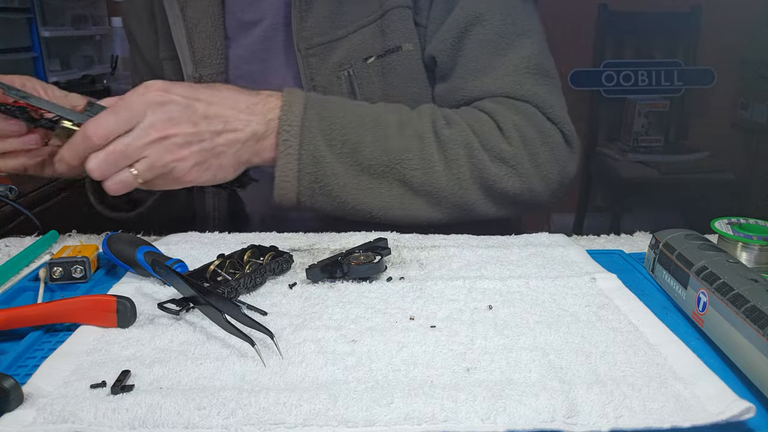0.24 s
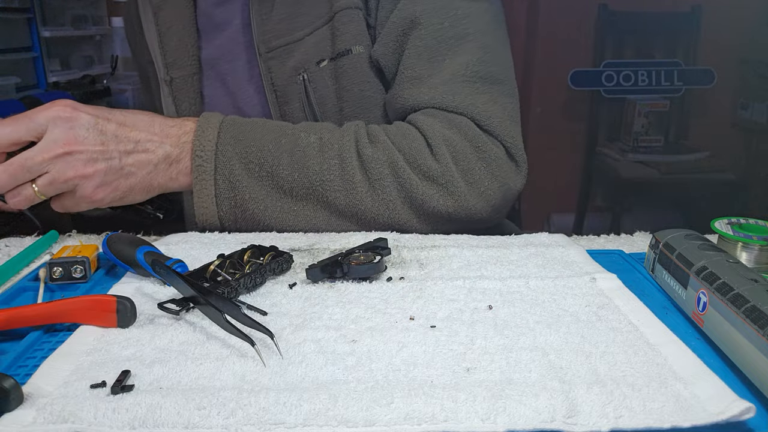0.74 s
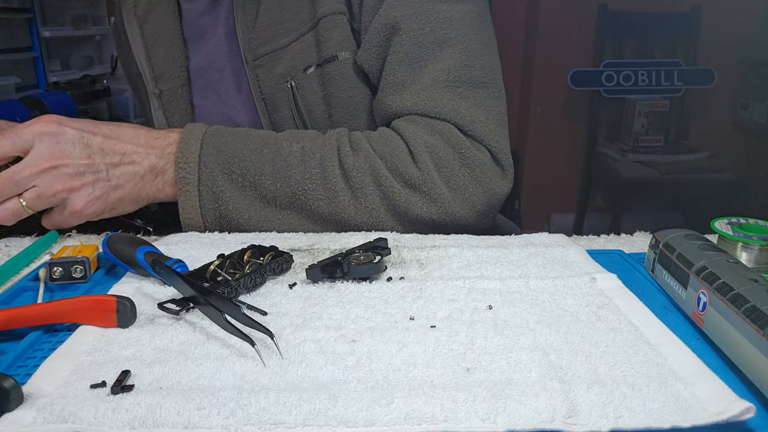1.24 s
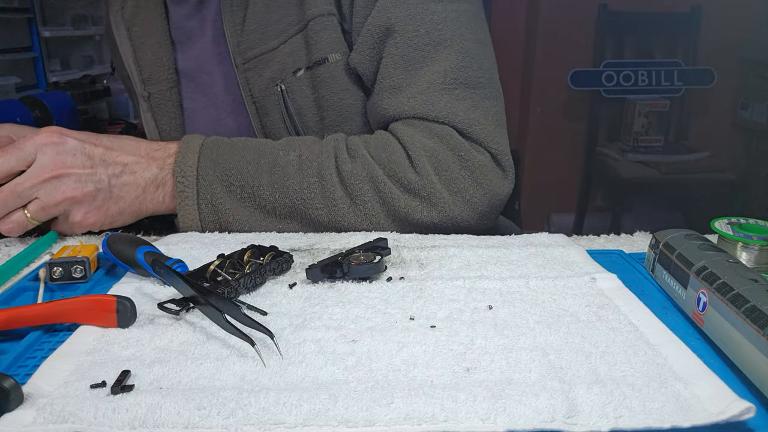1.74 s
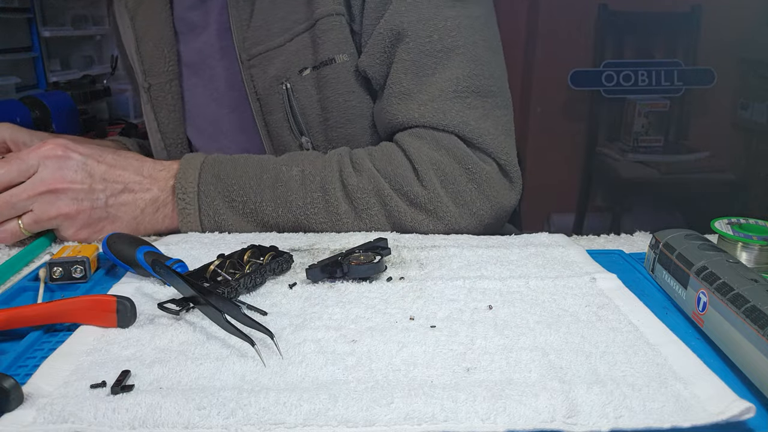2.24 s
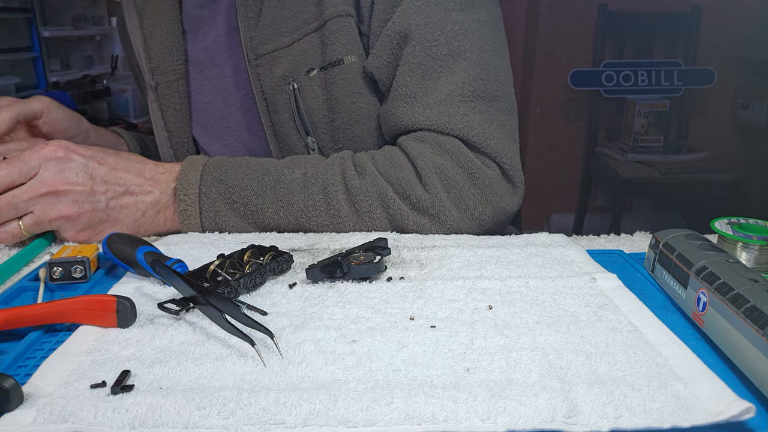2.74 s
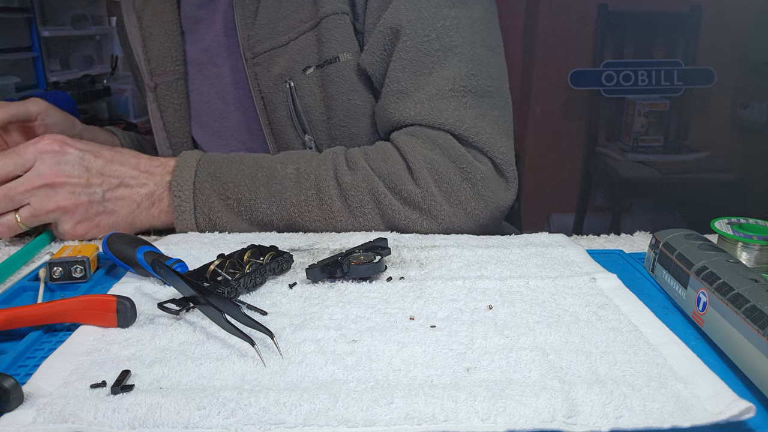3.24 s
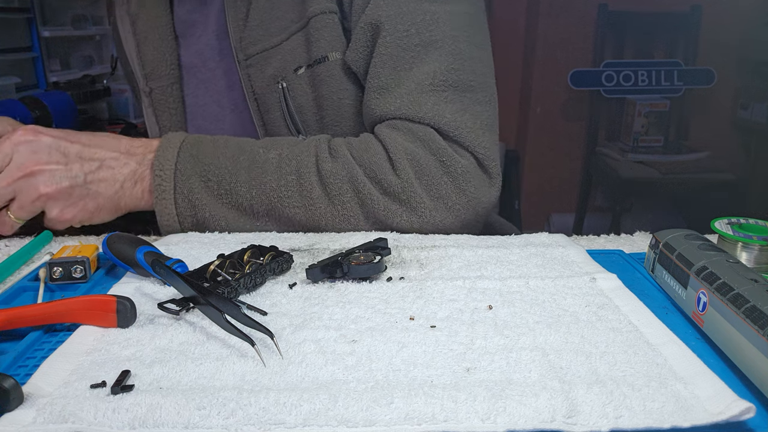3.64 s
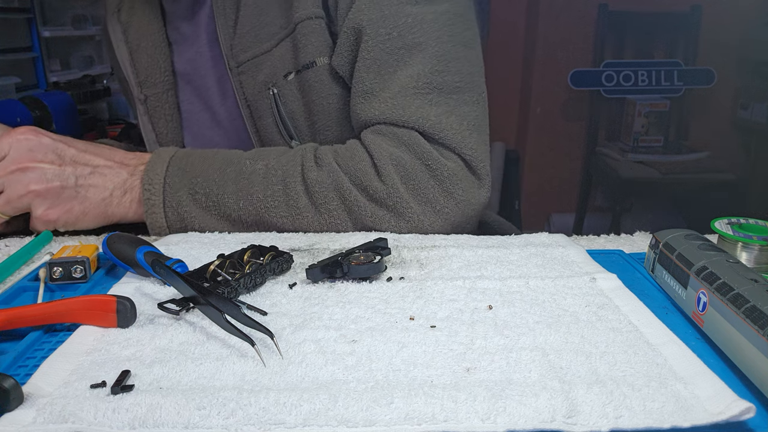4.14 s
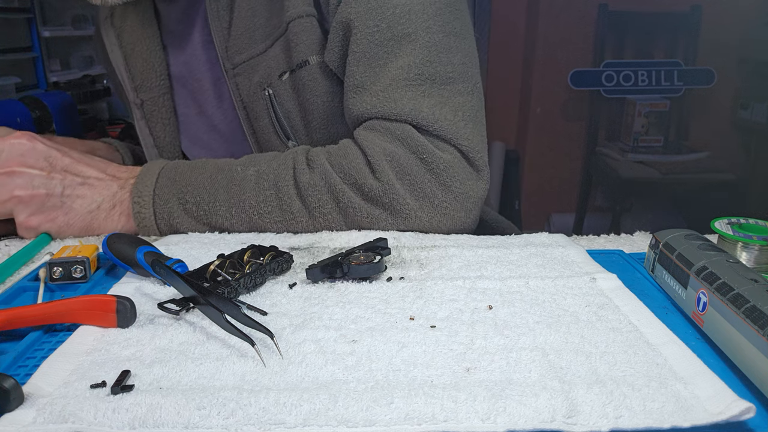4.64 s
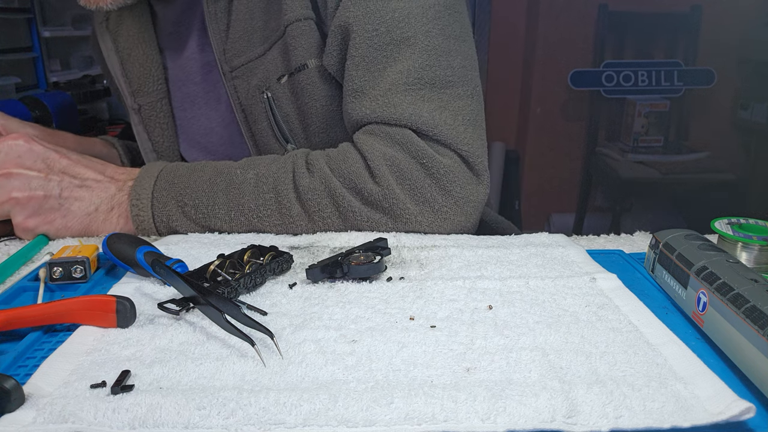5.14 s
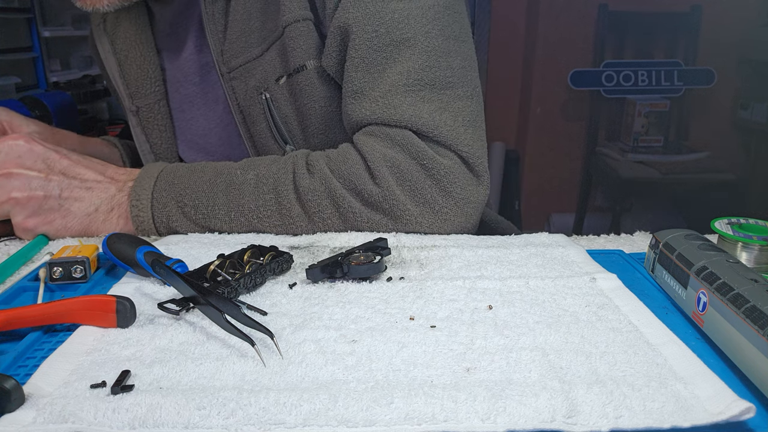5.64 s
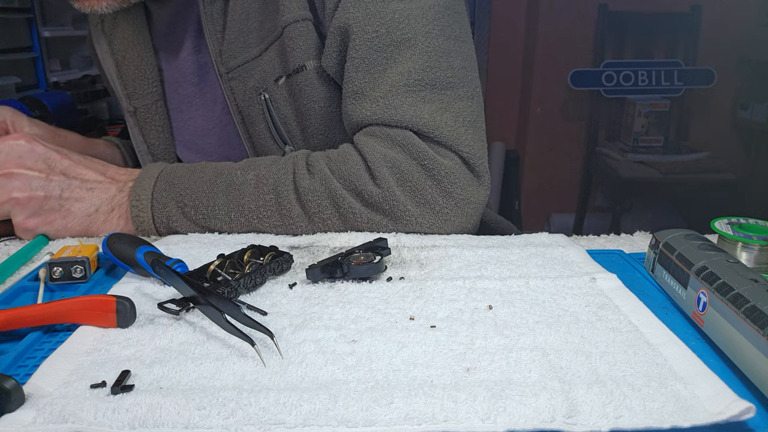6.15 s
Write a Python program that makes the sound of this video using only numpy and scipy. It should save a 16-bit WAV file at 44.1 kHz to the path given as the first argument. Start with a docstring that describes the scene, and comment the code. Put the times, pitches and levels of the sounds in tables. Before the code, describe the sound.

In a small room with faint background noise, a part knocks and scrapes in the jaws of a nearby metal vise being tightened. The taps start lightly and build to a cluster of hard clacks and bright clinks as the steel handle drops. After a brief lull comes another run of clicks and a firm last knock. Soft rubbing and brief steel squeaks fill the gaps.

```python
"""Winding a bench vise shut

A small metal vise closes on a motor part at a workbench in a small room. Part and jaws knock, each blow
a burst of tiny contacts that rings the vise and thuds in the bench top. The loose steel handle bar
drops and clinks in the spindle. Between blows the screw hisses, steel squeaks, and hands and a sleeve
rub over a faint room tone."""
import sys
import numpy as np
from scipy import signal
from scipy.fft import rfft, irfft, next_fast_len
from scipy.io import wavfile
from scipy.ndimage import uniform_filter1d

SR = 44100
rng = np.random.default_rng(int(sys.argv[2]) if len(sys.argv) > 2 else 0)


def waveform_to_disk(signal):
    """Save audio, clipped to [-1, 1], as 16-bit WAV at the path in sys.argv[1]."""
    frames = np.transpose(np.atleast_2d(signal))
    scaled = np.clip(frames, -1, 1) * 32767
    samples = np.round(scaled).astype(np.int16)
    wavfile.write(sys.argv[1], SR, samples)


N = 282636
HIT = 8192  # samples that one blow lasts

# modes of the bench top: pitch_hz, width_hz, level_db
BENCH_MODES = [(49.35, 15, -10), (82, 9.1, -14.5), (133.3, 7.7, 6.5), (158.6, 24, -3.5), (226, 25, -2),
               (258.8, 21, -1.5), (332, 55, 3), (369, 28, -1), (407.7, 30, -8), (533, 52, -9.5)]
# modes of the vise and the part in it: pitch_hz, width_hz, level_db
VISE_MODES = [(580, 30, -17.5), (702, 36, 3.5), (810, 60, -2.5), (887.7, 49, 11), (993, 50, 2),
              (1149, 24, -11), (1318, 180, 5), (1510, 310, 0), (1651, 76, 1.5), (1760, 220, -17),
              (1992, 96, -8), (2050, 37, -26)]
# spectrum of a knock's hard edge: freq_hz, level_db
EDGE_SPECTRUM = [(1500, -36.5), (2350, -7), (2750, 2.5), (3150, -6), (3580, 2), (3850, -3.5), (4150, -13.5),
                 (4500, -14), (5600, -31), (6550, -23), (7500, -27.5), (16000, -42)]
# spectrum of a bright steel-on-steel contact: freq_hz, level_db
TICK_SPECTRUM = [(2000, -23.5), (4400, 10.5), (5700, -5), (6600, -1), (7700, 2.5), (9300, -6.5),
                 (10000, -7.5), (11800, -17), (13200, -6.5), (16000, -5.5)]
# how hard the hands work: time_s, level_db
HAND_EFFORT = [(0.801, -79), (1.05, -69), (1.3, -55), (1.5, -60.5), (1.77, -53), (2.35, -66),
               (2.591, -55.5), (2.78, -38), (2.88, -47), (3.14, -50.5), (3.44, -40.5), (3.7, -51),
               (4.08, -57.5), (4.72, -74), (5.0, -65), (5.56, -60), (5.88, -64), (6.4, -44.5)]


def undb(db):
    """Decibels to gain."""
    return 10 ** (np.asarray(db) / 20)


def unit(x):
    """Scale to rms 1."""
    return x / np.sqrt(np.mean(x ** 2))


def add(track, start_s, x):
    """Mix x into the track from start_s."""
    start = max(int(start_s * SR), 0)
    part = x[:max(N - start, 0)]
    track[start:start + len(part)] += part


def fader(curve):
    """Gain at every sample from (time_s, level_db) points; shut outside them."""
    time_s, level_db = np.transpose(curve)
    return undb(np.interp(np.arange(N) / SR, time_s, level_db, left=-120, right=-120))


def along(points, size):
    """Read (freq_hz, value) points at every bin of a spectrum."""
    hz, value = np.transpose(points)
    return np.interp(np.log(np.fft.rfftfreq(size, 1 / SR) + 1), np.log(hz), value)


def colour(points, size=HIT):
    """Minimum-phase EQ curve through (freq_hz, level_db) points."""
    cepstrum = irfft(np.log(undb(along(points, size))), size)
    cepstrum[1:size // 2] *= 2
    cepstrum[size // 2 + 1:] = 0
    return np.exp(rfft(cepstrum))


def resonances(modes):
    """Frequency response of parallel (pitch_hz, width_hz, level_db) modes."""
    s = 1j * np.fft.rfftfreq(HIT, 1 / SR)
    return sum(undb(db) * width * s / (s * s + width * s + hz * hz) for hz, width, db in modes)


def strike(response, decay_ms, rise_ms=0.65, grain_db=3):
    """A burst of tiny uneven contacts rings a body; rms 1 over its first 12 ms."""
    ms = np.arange(HIT) / SR * 1000
    push, size = rng.standard_normal((2, HIT))
    envelope = np.exp(-ms / max(decay_ms, .5)) * (1 - np.exp(-ms / rise_ms))
    force = push * undb(grain_db * size) * envelope
    ring = irfft(rfft(force) * response)
    return ring / np.sqrt(np.mean(ring[:int(.012 * SR)] ** 2))


def slide(response, decay_ms):
    """A short slide: softer in attack and grainier than a strike."""
    return strike(response, decay_ms, rise_ms=1.1, grain_db=3.5)


def friction(response, slips_per_s, spread_db):
    """Dense little slips of uneven size ring a body."""
    slips = rng.random(N) < slips_per_s / SR
    sizes = undb(spread_db * np.minimum(rng.exponential(size=N), 4))
    force = slips * sizes * rng.choice([-1, 1], N)
    return unit(signal.oaconvolve(force, irfft(response))[:N])


def stereo_noise(size):
    """Left and right noise spectra, alike in the bass and wide in the treble."""
    # likeness of the two sides: freq_hz, correlation
    likeness = [(100, 0.84), (350, 0.9), (900, 0.022), (3000, 0.067), (8000, .05)]
    like = np.clip(along(likeness, size), 0, 1)
    mid, side = rfft(rng.standard_normal((2, size)))
    return (mid * np.sqrt(1 + like) + np.array([[1], [-1]]) * side * np.sqrt(1 - like)) / np.sqrt(2)


def even(response):
    """A cluttered room favours no pitch: level the broad humps and dips, keep the fine ripple."""
    spectrum, hz = rfft(response), np.fft.rfftfreq(len(response), 1 / SR)
    power = np.abs(spectrum) ** 2
    hump_db = 10 * np.log10(uniform_filter1d(power, size=21) / uniform_filter1d(power, size=301))
    return irfft(spectrum * colour(np.transpose([hz + 1, -hump_db]), len(response)))


def room(dry, wet_db, build_ms=0.33):
    """Direct sound plus dense reflections from bench and walls; the bass lingers."""
    # reverb time by band: centre_hz, t60_s
    decay_times = [(100, 0.39), (300, 0.35), (800, 0.27), (2000, 0.14), (5000, 0.2), (9000, 0.21),
                   (15000, 0.14)]
    centres, t60s = np.transpose(decay_times)
    size = 2 * HIT
    t, hz = np.arange(size) / SR, np.fft.rfftfreq(size, 1 / SR)
    noise, tail = stereo_noise(size), np.zeros((2, size))
    for share, t60 in zip(np.eye(len(centres)), t60s):
        band = np.interp(np.log(hz + 1), np.log(centres), share)
        tail += irfft(noise * band) * np.exp(-np.log(1000) * t / t60)
    tail *= 1 - np.exp(-1000 * t / build_ms)
    response = undb(wet_db) * unit(tail) / np.sqrt(size)
    response[:, 0] += 1  # direct sound
    return signal.oaconvolve(dry[None], np.array([even(side) for side in response]), axes=1)[:, :N]


def room_tone(size, level_db=-73):
    """A faint, steady bed of bass-heavy noise."""
    # spectrum of the quiet room: freq_hz, level_db
    spectrum = [(15, -35.5), (25, -18.5), (55, -4), (223, -1.5), (394, -8), (714, -19.5), (1040, -24.5),
                (1190, -13), (1610, -26.5), (1790, -17.5), (6380, -29), (9320, -21.5), (14800, -27.5),
                (16000, -26.5)]
    noise = irfft(stereo_noise(size) * undb(along(spectrum, size)), size)
    return undb(level_db) * unit(noise[:, :N])


def skin_brush(start_s=.132, level_db=-62):
    """Dry skin slides over the part with a short bright swish."""
    out, skin = np.zeros(N), colour([(2000, -14), (4500, 2), (7000, -10), (14000, 5)])
    add(out, start_s, undb(level_db) * strike(skin, decay_ms=30, rise_ms=16))
    return out


def sleeve_rustle(trim_db=-1):
    """A sleeve and fingers rustle as the part is carried to the vise."""
    # swell of the rustle: time_s, level_db
    carry = [(0.0, -60), (0.192, -62.5), (0.228, -78), (0.254, -66.5), (0.346, -67), (0.368, -70.5),
             (0.8, -89.5)]
    # spectrum of the cloth: freq_hz, level_db
    cloth = [(40, -17.5), (130, -11), (250, -7), (380, 2.5), (620, -12), (950, -12), (1220, -3),
             (1650, -10), (2900, -16.5), (5000, -19.5), (16000, -28.5)]
    return undb(trim_db) * fader(carry) * friction(colour(cloth), slips_per_s=2400, spread_db=3.8)


def screw_hiss():
    """The thread rubs in a fine hiss that swells and fades with each turn."""
    # turns of the screw: peak_s, level_db, half_length_s
    turns = [(1.39, -80, 0.055), (1.83, -65, 0.29), (2.24, -60.5, 0.13), (3.114, -56.5, .05),
             (3.672, -65.5, 0.091), (4.03, -75, .1), (5.562, -69, 0.049), (6.351, -68.5, 0.24)]
    # spectrum of the sliding thread: freq_hz, level_db
    thread = [(2000, -16.5), (3200, 1.5), (4200, 2.5), (5200, -2), (6500, -13), (8300, -2.5), (9500, -14.5),
              (10700, -6), (12000, -15.5), (16000, -13.5)]
    t = np.arange(N) / SR
    swell = sum(undb(db) * np.exp(-((t - peak_s) / half_s) ** 2) for peak_s, db, half_s in turns)
    return swell * friction(colour(thread), slips_per_s=6000, spread_db=2)


def rubbing(rumble_db=-4, scrape_db=-9):
    """Hands shift the vise on the bench; the part scrapes and shuffles in the jaws."""
    # short slides of the part: start_s, level_db, decay_ms
    shuffles = [(.047, -66, 2.6), (.317, -60, 11), (1.364, -45.5, 48), (1.425, -51, 17), (1.635, -51.5, 75),
                (1.843, -60, 8.4), (1.97, -55.5, 92), (2.962, -26, 23), (3.21, -31, 12), (3.762, -43.5, 35),
                (4.604, -54, 6.8), (4.7, -56.5, 6), (4.805, -39, 6.5)]
    bench_eq = colour([(70, 2), (100, -7.5), (130, -6.5), (400, -1), (600, -6.5), (3000, -26)])
    jaws_eq = colour([(3500, 5.5), (7000, -6)])
    bench = resonances(BENCH_MODES) * bench_eq
    jaws = (resonances(VISE_MODES) + undb(-26) * colour(EDGE_SPECTRUM)) * jaws_eq
    rumble = undb(rumble_db) * friction(bench, slips_per_s=600, spread_db=5.5)
    scrape = undb(scrape_db) * friction(jaws, slips_per_s=900, spread_db=3.8)
    out = fader(HAND_EFFORT) * (rumble + scrape)
    for start_s, db, decay_ms in shuffles:
        add(out, start_s, undb(db) * slide(jaws, decay_ms))
    return out


def squeaks(width_hz=48):
    """Steel drags on steel and one resonance of the bar or the screw sings briefly."""
    # singing slips: start_s, pitch_hz, level_db, decay_ms
    drags = [(0.899, 2850, -70, 7), (1.201, 2870, -59, 3.8), (1.33, 10530, -65, 45),
             (1.346, 2810, -51.5, 13), (1.431, 3940, -54.5, 9.9), (1.515, 2810, -64, 7),
             (1.621, 2830, -52.5, 2), (1.741, 2880, -57, 14), (1.867, 2824, -48, 5.3),
             (2.972, 10520, -36, 40), (3.505, 2800, -43, 1.7), (4.693, 2800, -66.5, 8),
             (6.136, 2904, -57, 35), (6.284, 2920, -55, 47)]
    out = np.zeros(N)
    for start_s, hz, db, decay_ms in drags:
        add(out, start_s, undb(db) * slide(resonances([(hz, width_hz, 0)]), decay_ms))
    return out


def ticks():
    """Metal touches metal with a bright, toneless tick."""
    # light contacts: start_s, level_db
    touches = [(0.045, -60.5), (.317, -60.5), (0.638, -69), (1.275, -55.5), (2.985, -36.5), (3.264, -25.5),
               (3.504, -53), (4.253, -57.5), (4.604, -59), (5.532, -55), (6.329, -42.5)]
    out, bright = np.zeros(N), colour(TICK_SPECTRUM)
    for start_s, db in touches:
        add(out, start_s, undb(db) * strike(bright, decay_ms=5.5))
    return out


def bar_band(low_hz, high_hz, detune=0.0027, finger_width_hz=40):
    """One band of the handle bar's modes; fingers damp them and shift them from clink to clink."""
    # modes of the bar: pitch_hz, width_hz, level_db
    bar_modes = [(2840, 11, 5.5), (2700, 27, -10.5), (4025, 36, -6.5), (8330, 71, 8.5), (8190, 43, -9.5),
                 (7820, 27, 0.5), (10600, 40, -16), (10640, 110, 12.5), (11450, 69, 4), (9950, 77, -4.5),
                 (14470, 200, -11.5), (15800, 220, -3), (14630, 360, -11)]
    shifts = 1 + detune * rng.standard_normal(len(bar_modes))
    return resonances([(hz * shift, width + finger_width_hz, db)
                       for (hz, width, db), shift in zip(bar_modes, shifts) if low_hz <= hz < high_hz])


def handle_clinks(contact_db=-8):
    """The bar rattles in its hole, brighter on hard contacts; heavy landings ring the spindle."""
    # clinks of the bar: start_s, level_db, hardness_db
    clinks = [(1.416, -57, -9), (1.72, -61.5, -6), (1.8081, -45, -4), (2.14, -59, -4), (2.361, -67.5, -7.5),
              (2.411, -40, 10), (2.69, -49, 12.5), (2.954, -32, 6.5), (2.984, -38, 3), (3.123, -45.5, -5.5),
              (3.205, -37, 20), (3.215, -38.5, 9.5), (3.264, -28, -1), (3.72, -49, -5.5), (3.786, -43, -3),
              (4.054, -62, -4), (4.779, -50.5, 1), (4.855, -53.5, -1), (5.016, -65, -15),
              (5.103, -59.5, -2), (5.496, -49, -5.5), (5.719, -52, -9.5), (5.999, -46.5, -7),
              (6.342, -46, 5)]
    # bands of the bar's modes: low_hz, high_hz
    bands = [(2000, 5000), (7000, 9200), (9200, 13000), (13000, 17000)]
    # each band's share of a clink: level_db, db_per_hardness_db
    shares = [(-1.5, -0.86), (1.5, 0.4), (1.5, 0.08), (-8.5, 0.86)]
    # the bar lands on its end knob: start_s, level_db
    landings = [(2.954, -28), (3.206, -28), (3.263, -18.5)]
    # modes of the spindle: pitch_hz, width_hz, level_db
    spindle_modes = [(2560, 30, -12), (2723, 20, 0), (3595, 45, -11), (3899, 25, -13)]
    out, bright = np.zeros(N), colour(TICK_SPECTRUM)
    for start_s, db, hard_db in clinks:
        add(out, start_s, undb(db + contact_db) * strike(bright, decay_ms=5))
        for band, (share_db, per_hardness) in zip(bands, shares):
            ring = strike(bar_band(*band), decay_ms=2.5)
            add(out, start_s, undb(db + share_db + per_hardness * hard_db) * ring)
    for start_s, db in landings:
        add(out, start_s, undb(db) * strike(resonances(spindle_modes), decay_ms=3.6))
    return out


def jostles(per_s=6, offset_db=-2, spread_db=2.5):
    """Cues for faint extra knocks at uneven moments, as strong as the hands are busy."""
    time_s, effort_db = np.transpose(HAND_EFFORT)
    first_s, last_s = time_s[0], time_s[-1]
    count = int((last_s - first_s) * per_s)
    jitter, size, weight, hardness = rng.standard_normal((count, 4)).T
    starts = np.clip(first_s + (np.arange(count) + 1 + jitter / 2) / per_s, first_s, last_s)
    levels = np.interp(starts, time_s, effort_db) + offset_db + spread_db * size
    return list(zip(starts, levels, spread_db * weight, spread_db * hardness))


def jaw_knocks(paths=5, medium_db=-34.5, dull_db=-7, mode_spread_db=3.5):
    """Each knock clacks in the vise, cracks with a hard metal edge and thuds in the bench."""
    # part and jaws collide: start_s, level_db, extra_thud_db, extra_edge_db
    blows = [(.82, -72, 11, 0), (.85, -53.5, 6.5, 5), (.886, -73, 8, -4), (.955, -58, 7.5, -8),
             (1.019, -81, 19, -5), (1.103, -80.5, 19.5, -5), (1.194, -45, 1, 0), (1.32, -41, 1, 1),
             (1.337, -54, 0, 1), (1.416, -40, 2, 0), (1.6, -45.5, -3, 4), (1.623, -40.5, 0, -15),
             (1.679, -47, 5.5, -10), (1.717, -41.5, -16, -12), (1.759, -49, -7, -7), (1.811, -46.5, 1, 5),
             (1.843, -35, -1.5, -19), (1.874, -58, -5, 3), (2.14, -43, -1.5, 5), (2.188, -57, 8, 6),
             (2.413, -32, 0.5, 12), (2.528, -35.5, 2.5, 5.5), (2.689, -28, 6, -2.5),
             (2.767, -27.5, 5, -0.5), (2.78, -29, 1.5, 1.5), (2.926, -29.5, 1.5, 4.5),
             (2.952, -18.5, -5.5, 4), (2.985, -25, 4.5, 11), (3.119, -38, 0, 9.5), (3.206, -19, 5, -4.5),
             (3.233, -30, 6, -7), (3.263, -16, 3.5, 2.5), (3.428, -40.5, -2.5, 9),
             (3.506, -31.5, -1.5, 5.5), (3.627, -53, 13.5, -16), (3.722, -43, 3, -3),
             (3.785, -33.5, -3, -9), (3.888, -46.5, 2, -20.5), (3.952, -48, -2.5, 8.5),
             (4.055, -46, 0.5, 1), (4.257, -47, -5, 15), (4.283, -47.5, -3, 16), (4.44, -59.5, 1, 13.5),
             (4.789, -35.5, -1, 4), (4.82, -33.5, 4, 2.5), (4.9, -35, 2, 2), (5.01, -39, -4, 6.5),
             (5.033, -33, 7, -12), (5.073, -30, -7, 0.5), (5.085, -30.5, 2.5, 6), (5.193, -47.5, 8, 2.5),
             (5.338, -42, -4, -1.5), (5.388, -33, 2, 6), (5.488, -36, -2.5, 8.5), (5.535, -30.5, -0.5, -12),
             (5.578, -35, -20, 5), (5.633, -35.5, -3, 3), (5.648, -42, -2, 9), (5.718, -34, 4, -1.5),
             (5.749, -50, 7, 2), (5.902, -46.5, 7, -3), (5.995, -32.5, -1.5, 7.5), (6.135, -46, -4, -14.5),
             (6.178, -43, -8, 2.5), (6.23, -45.5, 6, -5), (6.326, -20, 5.5, -4)]
    # the part chatters less as the jaws close on it: time_s, chatter_decay_ms, clear_modes_db
    grip = [(1.6, 4.6, 14), (2.4, 2.9, -2), (3.3, 3, 1), (4.8, 2.02, -3.5)]
    grip_s, grip_ms, grip_db = np.transpose(grip)
    damping = colour([(150, -18), (500, 5), (2200, 7), (3200, -25.5), (5000, -24.5), (16000, -41)])
    cushion = colour([(25, -21), (70, 4.5), (100, -6.5), (130, 3.5), (550, 0),
                      (1500, -14.5), (6000, -43.5)])
    vise = np.array([resonances([mode]) * damping for mode in VISE_MODES])
    bench = resonances(BENCH_MODES) * cushion
    edge = colour(EDGE_SPECTRUM)
    tracks = np.zeros((paths, N))  # knocks radiate different ways: a track per path through the room
    for k, (start_s, db, extra_thud_db, extra_edge_db) in enumerate(blows + jostles()):
        # stronger blows tip the balance from thud to edge
        thud_db = db - 6 - 0.24 * (db - medium_db) + extra_thud_db
        edge_db = db - 15.5 + 0.59 * (db - medium_db) + extra_edge_db
        chatter_ms = np.interp(start_s, grip_s, grip_ms)
        clear_db = np.interp(start_s, grip_s, grip_db)
        # each contact point favours other clear modes, over a bed of heavily damped ones
        mode_gains = undb(mode_spread_db * rng.standard_normal(len(vise)))
        clack = undb(clear_db) * (mode_gains @ vise) + undb(dull_db) * damping
        track = tracks[k % paths]
        add(track, start_s - .001, undb(db) * strike(clack, chatter_ms))
        add(track, start_s - .0005, undb(edge_db) * strike(edge, 0.89 * chatter_ms))
        add(track, start_s - .002, undb(thud_db) * strike(bench, 1.4 * chatter_ms))
    return tracks


def scene(left_lag_samples=14):
    """The vise stands off to one side, so its sound reaches the left channel later."""
    # the two sides differ in colour: freq_hz, left_minus_right_db
    side_colour = [(80, -4), (250, 0), (600, 0.5), (2500, 2), (5000, -5), (9500, 4.5), (14500, -5.5)]
    size = next_fast_len(N, True)
    bed = room_tone(size)
    steel = room(handle_clinks() + ticks() + squeaks(), wet_db=0.5)
    hands = room(rubbing() + screw_hiss() + sleeve_rustle() + skin_brush(), wet_db=0.5)
    knocks = sum(room(track, wet_db=1) for track in jaw_knocks())
    left, right = steel + hands + knocks
    left = np.pad(left, (left_lag_samples, 0))[:N]
    lean_db = np.array([[1], [-1]]) * along(side_colour, size) / 2
    spectra = rfft(np.array([left, right]), size) * undb(lean_db)
    return irfft(spectra, size)[:, :N] + bed


def record(dry):
    """Soft saturation rounds the highest peaks; a steep low-pass cuts the top."""
    top_hz = 15900
    return signal.sosfilt(signal.ellip(8, .2, 70, top_hz, fs=SR, output="sos"), np.tanh(dry))


dry = scene()
out = record(dry)
waveform_to_disk(out)
```